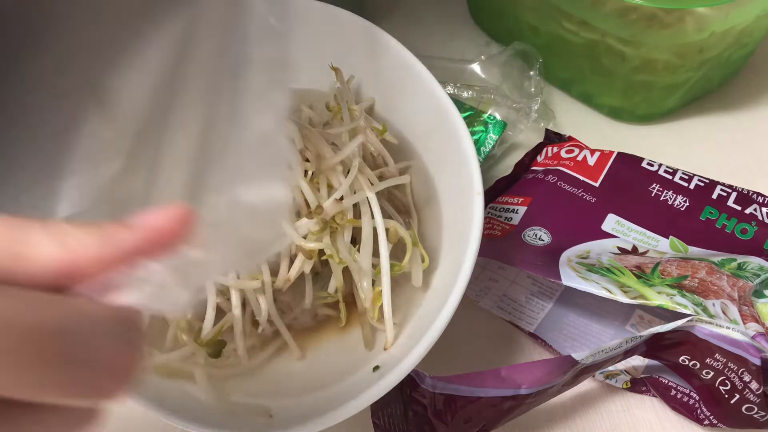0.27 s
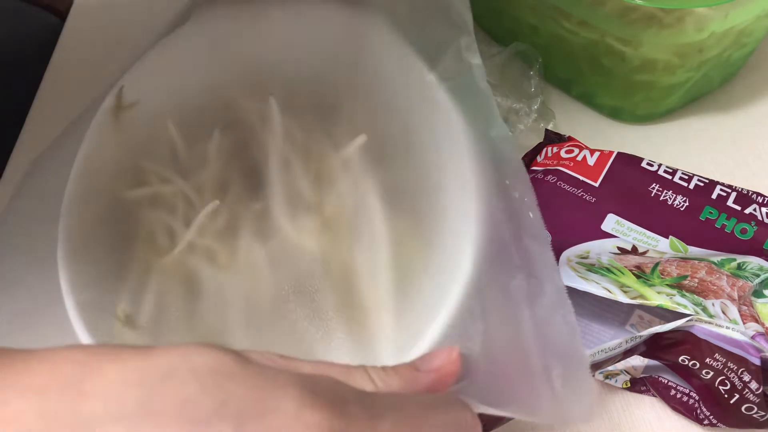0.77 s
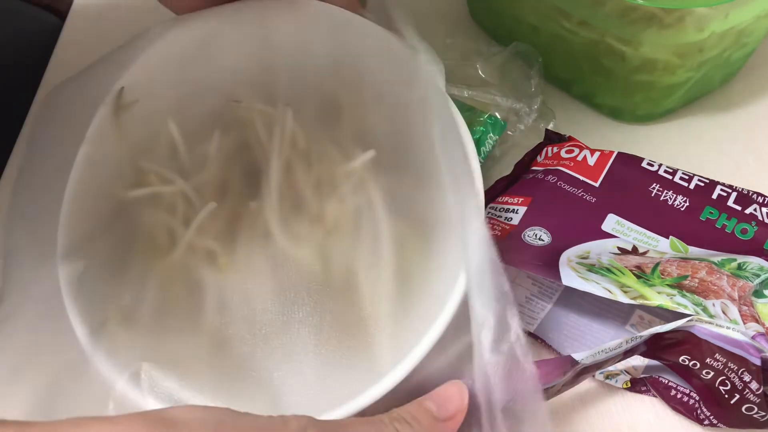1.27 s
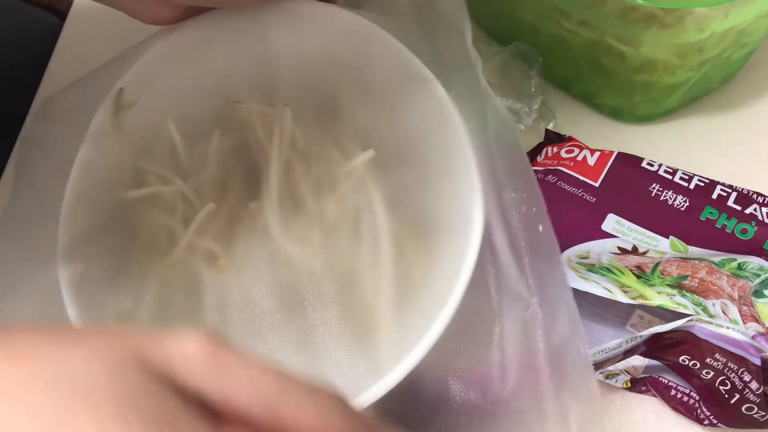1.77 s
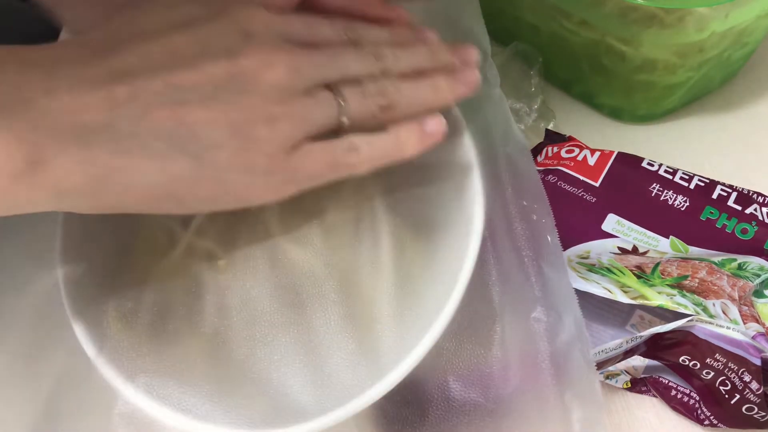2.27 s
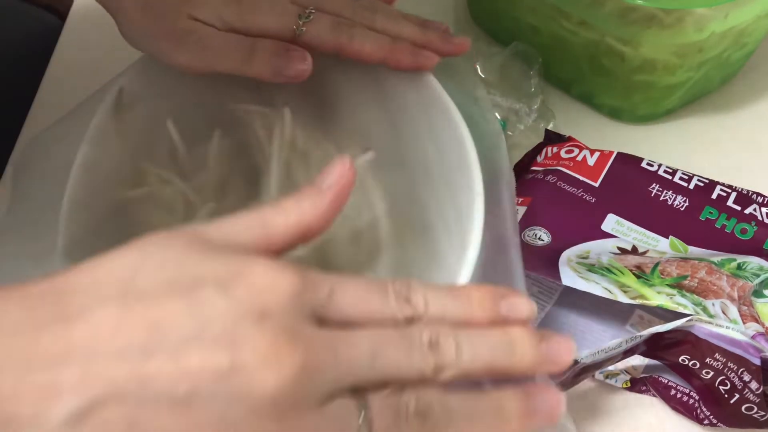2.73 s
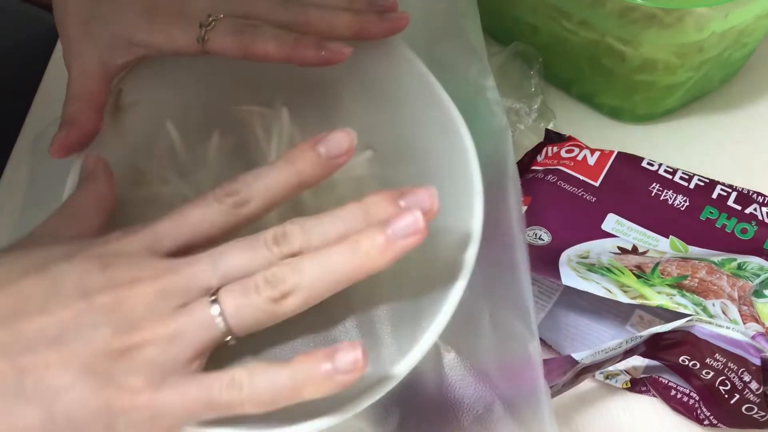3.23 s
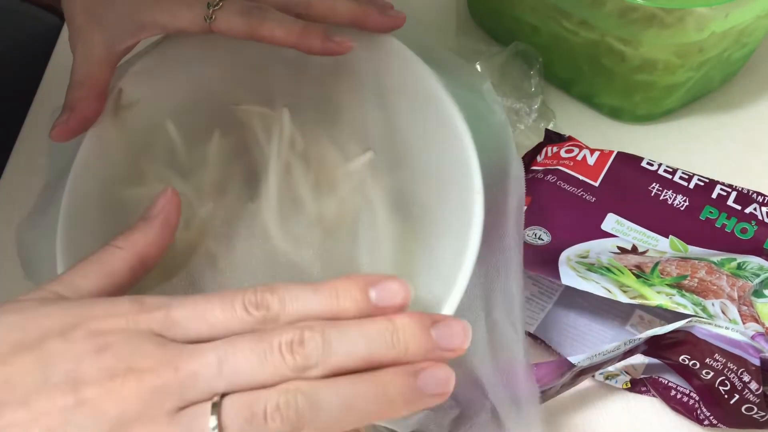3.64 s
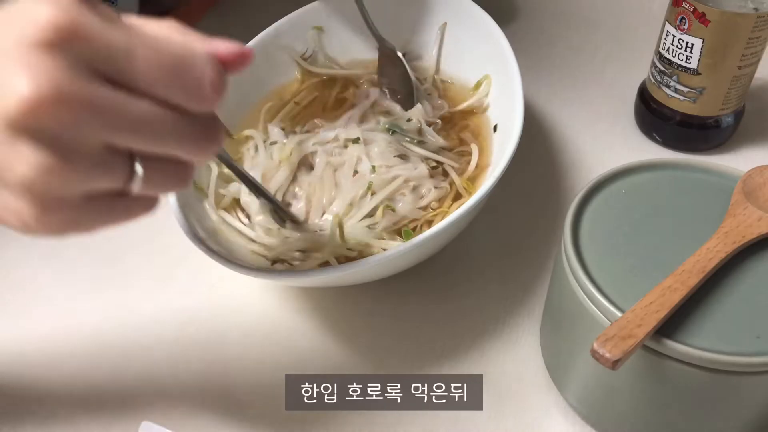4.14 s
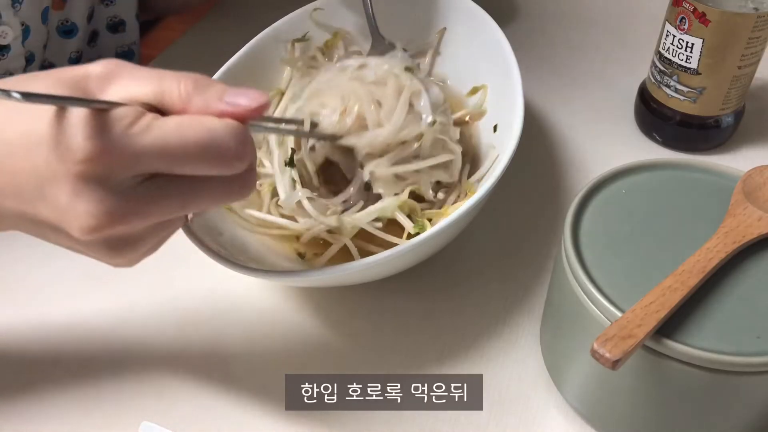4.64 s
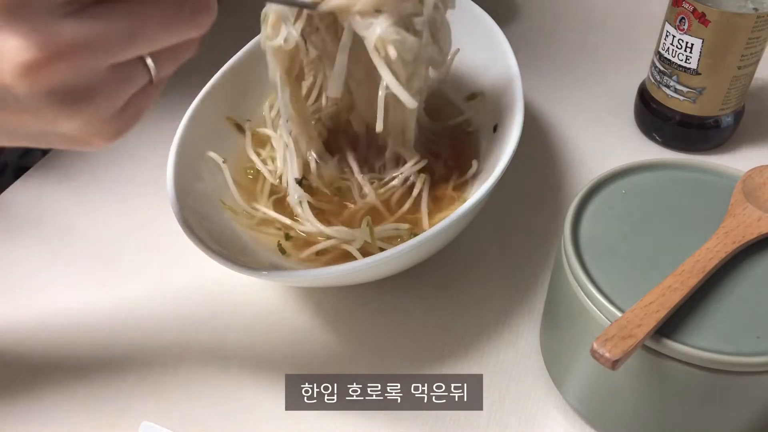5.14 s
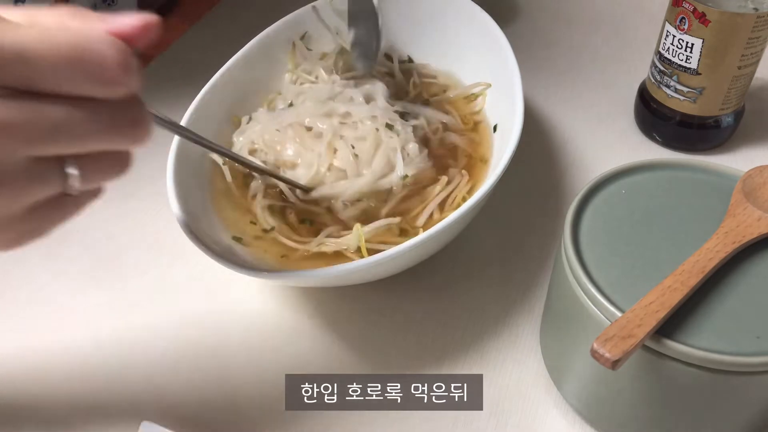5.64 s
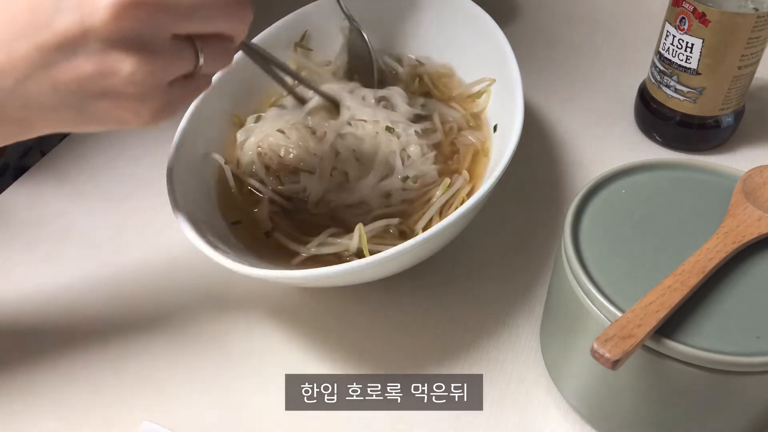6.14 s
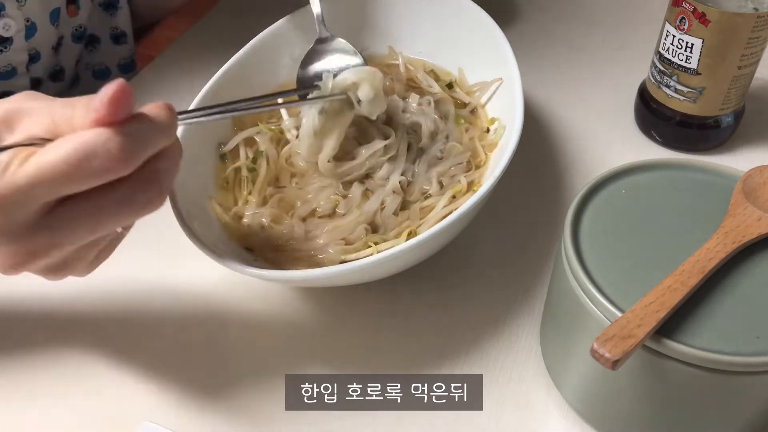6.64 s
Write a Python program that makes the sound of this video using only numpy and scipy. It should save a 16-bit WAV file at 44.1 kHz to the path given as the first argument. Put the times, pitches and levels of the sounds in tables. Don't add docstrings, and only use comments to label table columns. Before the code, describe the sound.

Cling film crackles and snaps as hands smooth it over a ceramic bowl, then wet noodles tick softly and cutlery knocks the bowl.

```python
import sys
import numpy as np
from scipy import signal
from scipy.fft import rfft, irfft, next_fast_len
from scipy.io import wavfile

SR = 44100
rng = np.random.default_rng(int(sys.argv[2]) if len(sys.argv) > 2 else 0)


def master_out(mix):
    frames = np.transpose(np.atleast_2d(mix))
    ceiling = np.clip(frames, -1, 1)
    pcm = np.round(ceiling * 32767).astype(np.int16)
    wavfile.write(sys.argv[1], SR, pcm)


def invert_db(level):
    return 10 ** (np.asarray(level, dtype=float) / 20)


N = 303828
MOVES_S = [3.979, 6.657]


def rms_one(x):
    return x / np.sqrt(np.mean(x ** 2) + 1e-20)


def noise():
    return rng.standard_normal(N)


def in_time(rows):
    s, *columns = np.transpose(rows)
    return [np.interp(np.arange(N) / SR, s, c, left=-200, right=-200) for c in columns]


def drift(rate_hz):
    r = np.exp(-2 * np.pi * rate_hz / SR)
    once = signal.lfilter([1], [1, -r], rng.standard_normal(N + SR))
    return rms_one(signal.lfilter([1], [1, -r], once)[SR:])


def resonate(x, hz, width_hz):
    r = np.exp(-np.pi * width_hz / SR)
    zeros = (1 - r * r) / 2 * np.array([1, 0, -1])
    return signal.lfilter(zeros, [1, -2 * r * np.cos(2 * np.pi * hz / SR), r * r], x)


def body(x, peaks):
    return sum((-1) ** k * invert_db(db) * resonate(x, hz, width_hz)
               for k, (hz, width_hz, db) in enumerate(peaks))


def butter(x, order, hz, kind):
    return signal.sosfilt(signal.butter(order, hz, kind, fs=SR, output="sos"), x)


def colour(x, points):
    hz, db = np.transpose(points)
    f = np.fft.rfftfreq(N, 1 / SR) + 1
    gain_db = np.interp(np.log(f), np.log(hz), db, left=-90, right=-90)
    return rms_one(irfft(rfft(x) * invert_db(gain_db), N))


def bursts(per_s, spread_db, length_s):
    sizes = invert_db(spread_db * np.minimum(rng.exponential(1, N), 3))
    slips = sizes * (rng.random(N) < per_s / SR)
    gate = signal.lfilter([1], [1, -np.exp(-1 / (length_s * SR))], slips + 1e-18)
    return gate * noise()


def puff(decay_s):
    return rng.standard_normal(1300) * np.exp(-np.arange(1300) / (decay_s * SR))


def add(out, s, sound, peak_db):
    at = round(s * SR)
    out[at:at + len(sound)] += (invert_db(peak_db) * sound / np.abs(sound).max())[:N - at]


def swell(start, end, db, rise_db_per_s, fall_db_per_s):
    t = np.arange(0, N, 8) / SR
    before, after = np.maximum(start - t, 0), np.maximum(t - end, 0)
    return np.repeat(invert_db(db - rise_db_per_s * before - fall_db_per_s * after), 8)[:N]


# (start [s], end [s], rustle [dB], drumming re rustle [dB], graininess [0-1])
SPELLS = [(0, 0.19, -50.5, -9, 0.75), (0.182, 0.681, -51, -5, 0.85), (.69, .87, -59, 3, 0.66),
          (.87, 1.66, -49.5, 1, 0.93), (1.68, 1.853, -54.5, 3, 0.84), (1.87, 2.087, -65.5, 3, 1),
          (2.375, 2.38, -50.5, -3, 0.3), (2.394, 2.762, -51, -0.5, 0.76), (2.775, 2.988, -52, -2, 0.6),
          (2.96, 3.14, -78.5, 13.5, 1), (3.205, 3.23, -67, -4, 0.7), (3.232, 3.5, -55.5, -4, 0.3),
          (3.5, 3.986, -50, -4.5, 0.79)]
GRIP_DB_PER_S, LET_GO_DB_PER_S = 2200, 505
# (start [s], length [s], level [dB], extra drumming [dB])
TUGS = [(.003, 0.036, -49, 5.5), (0.213, 0.098, -45, -4), (0.445, 0.026, -47, -2),
        (0.52, 0.086, -46.5, 0.5), (0.75, 0.05, -53, -1.5), (0.907, 0.059, -45, 1.5),
        (1.013, 0.14, -45.5, 1), (1.172, 0.015, -43.5, -1), (1.3, 0.021, -45.5, -2),
        (1.413, 0.042, -45.5, 1.5), (1.48, 0.093, -45, -13), (1.536, 0.09, -40.5, -5),
        (1.739, 0.0096, -49.5, -10), (1.794, 0.0089, -47.5, -3.5), (1.979, 0.016, -51.5, -5.5),
        (2.426, 0.025, -49, 10), (2.541, 0.017, -41.5, -0.5), (2.585, 0.045, -41.5, -1.5),
        (2.702, 0.037, -46, -1.5), (2.75, 0.074, -46, -0.5), (2.878, 0.041, -47, 0.5),
        (3.243, 0.033, -47, 5.5), (3.533, 0.041, -48, 3.5), (3.601, 0.039, -41.5, 0.5),
        (3.676, 0.1, -47, 1.5), (3.83, 0.068, -48.5, 0.5)]
TUG_RISE_DB_PER_S, TUG_FALL_DB_PER_S = 626, 412


def hands():
    spells = [swell(start, end, db, GRIP_DB_PER_S, LET_GO_DB_PER_S) for start, end, db, *_ in SPELLS]
    tugs = [swell(s, s + length, db, TUG_RISE_DB_PER_S, TUG_FALL_DB_PER_S)
            for s, length, db, _ in TUGS]
    bed = np.max(spells, axis=0)
    tug_drums = [tug * invert_db(row[3]) for tug, row in zip(tugs, TUGS)]
    drumming = np.max([bed] + tug_drums, axis=0)
    now = np.array(SPELLS)[np.argmax(spells, axis=0)]
    return np.max([bed] + tugs, axis=0), drumming * invert_db(now[:, 3]), np.clip(now[:, 4], 0, 1)


def scattered(spread_db):
    return invert_db(spread_db * np.minimum(rng.exponential(1, N), 2.5)) * rng.choice([-1, 1], N)


CREASES_PER_S, CREASES_DB = 300, -9.5


def creases():
    sizes = scattered(8)
    born, dealt = rng.random(N) < CREASES_PER_S / SR, rng.integers(0, 10, N)
    return rms_one(sum(resonate(sizes * born * (dealt == k) + 1e-18, hz, 0.13 * hz) / np.sqrt(hz)
                       for k, hz in enumerate(np.geomspace(2000, 13000, 10))))


# (frequency [Hz], density [dB per Hz])
CRACKLE = [(880, -14), (1500, 12), (2220, 3), (2770, 8.5), (3180, 7), (5870, 8), (12000, 5.5), (15700, 0),
           (16100, -10), (16500, -45)]
# (frequency [Hz], width [Hz], level [dB])
DRUM = [(732, 420, 5.5), (1350, 247, 10.5), (1880, 780, -5)]
# (low [Hz], high [Hz])
PATCHES_HZ = [(700, 3000), (3000, 5500), (5500, 9500), (9500, 18000)]
# (time [s], peak [dB], pitch [Hz])
PULL_SNAPS = [(0.192, -21, 6390), (0.236, -37, 4700), (0.2523, -23, 7540), (0.3195, -24, 9000),
              (0.4514, -32, 4400), (0.4692, -14, 7860), (0.5332, -36, 1630), (0.559, -19, 6500),
              (0.646, -9, 8800), (0.7658, -19.5, 8100), (0.828, -21, 7610), (0.8591, -20, 8950),
              (1.0151, -30, 1980), (1.0958, -12.5, 2780), (1.1717, -18, 5800), (1.2527, -15, 4060),
              (1.3395, -13.5, 6100), (1.512, -17, 3820), (1.5274, -7.5, 8400), (1.5553, -28, 5450),
              (1.589, -19, 6100), (1.706, -20, 2600), (1.7496, -32, 1620), (1.789, -28, 1600),
              (1.8467, -29, 1620), (1.9435, -28.5, 1640), (1.969, -32, 1970), (1.9969, -16.5, 4030),
              (2.0862, -22.5, 12000)]
# (time [s], peak [dB], pitch [Hz])
SMOOTH_SNAPS = [(2.379, -40, 1940), (2.3987, -24, 1780), (2.4123, -13.5, 1950), (2.442, -36, 1880),
                (2.4943, -31, 1910), (2.533, -22, 3640), (2.683, -23, 6320), (2.7026, -14, 8600),
                (2.7232, -16.5, 1880), (2.7707, -20.5, 3800), (2.648, -25, 1290), (2.881, -19, 1400),
                (2.917, -25, 1490), (2.9674, -22.5, 1540), (3.044, -44, 1510), (3.133, -26.5, 3650),
                (3.2023, -53, 2010), (3.237, -21, 1530), (3.508, -43, 1560), (3.528, -16.5, 7200),
                (3.5647, -16, 3920), (3.6297, -9, 6560), (3.684, -8, 10900), (3.717, -15.5, 11200),
                (3.789, -20.5, 3940), (3.906, -19, 4160), (3.9539, -21, 11100), (3.9716, -15, 10500)]
# (time [s], peak [dB], pitch [Hz])
THUDS = [(0.432, -37, 1650), (1.1085, -17, 1300), (1.43, -22, 1300), (1.4518, -23, 1500),
         (1.798, -19, 1900), (2.045, -36.5, 934), (3.43, -24.5, 1200), (3.4705, -28, 1350),
         (3.54, -27, 1410), (3.58, -25, 1320), (3.8521, -23, 1180)]
# (time [s], peak [dB], pitch [Hz])
PULL_PRICKS = [(0.012, -22.5, 5400), (0.0252, -27, 2870), (0.0374, -29, 4390), (0.0842, -40, 5100),
               (0.1643, -26, 2500), (0.2129, -39, 3040), (0.2817, -22, 4640), (0.3274, -29, 9000),
               (0.3546, -33, 8000), (0.3716, -33, 5720), (0.4804, -41, 5250), (0.535, -25.5, 8400),
               (0.6065, -32, 5370), (0.637, -24.5, 8090), (0.6634, -34, 11700), (0.676, -33, 7000),
               (0.6874, -34, 9310), (0.755, -29.5, 3970), (0.787, -25, 7410), (0.8574, -28.5, 8230),
               (0.8884, -46, 6680), (0.9046, -29, 2650), (0.9645, -27.5, 7500), (1.0021, -43, 6000),
               (1.0395, -24, 7140), (1.0435, -24, 6000), (1.063, -30, 7000), (1.077, -26, 5500),
               (1.1116, -24, 7100), (1.1204, -23, 8000), (1.196, -24, 8010), (1.2343, -24, 5510),
               (1.2885, -28, 4930), (1.299, -32, 2730), (1.3099, -26, 7910), (1.4077, -38, 2790),
               (1.4505, -33, 7570), (1.484, -33, 5270), (1.496, -28, 3630), (1.683, -40, 2520),
               (1.7174, -25, 3460), (1.748, -29, 7400), (1.7883, -38, 2680), (1.8463, -31, 8240),
               (1.9774, -34, 4210)]
# (time [s], peak [dB], pitch [Hz])
SMOOTH_PRICKS = [(2.396, -19.5, 3470), (2.4493, -28, 3600), (2.4942, -23, 4180), (2.5474, -27, 3750),
                 (2.579, -34, 4150), (2.5935, -25, 6090), (2.6294, -18.5, 8200), (2.648, -23, 2650),
                 (2.6597, -27, 7450), (2.723, -17, 11500), (2.8397, -26, 6040), (3.532, -25, 9500),
                 (3.5612, -27, 13000), (3.582, -24, 9500), (3.5995, -28, 4000), (3.621, -18.5, 9000),
                 (2.9794, -34, 3270), (3.044, -36.5, 5270), (3.1217, -50, 4070), (3.2246, -44, 2780),
                 (3.5694, -24, 8950), (3.5814, -29, 3070), (3.6077, -31, 3660), (3.6338, -15, 7100),
                 (3.671, -28, 11900), (3.6994, -29, 12500), (3.7474, -23, 8910), (3.75, -24, 3830),
                 (3.8363, -22.5, 7110), (3.86, -29, 3930)]
SNAP_DRUM_DB, SNAP_DRUM_DB_PER_OCTAVE = -23.5, -4.5
TREBLE_HZ, TREBLE_SWING_DB = 7100, 3


def film():
    crackle, drum, grain = hands()
    clumps = invert_db(2.2 * drift(60))
    slips = 0.43 * rms_one(bursts(500 * clumps, spread_db=4.5, length_s=0.00049))
    for band_hz in PATCHES_HZ:
        patch = rms_one(bursts(350 * clumps, spread_db=6.0, length_s=0.0011))
        slips += 0.94 * butter(patch, 1, band_hz, "band")
    slide = noise() * invert_db(2.9 * drift(64))
    rub = grain * rms_one(slips) + np.sqrt(1 - grain ** 2 + invert_db(-62.0)) * slide
    sheet = colour(rub, CRACKLE) + invert_db(CREASES_DB) * grain * creases()
    treble = butter(sheet, 1, TREBLE_HZ, "high")
    treble_db = TREBLE_SWING_DB * grain * drift(11.3) - 2.6 * grain
    out = crackle * (sheet + (invert_db(treble_db) - 1) * treble)
    slow = rms_one(bursts(200 * invert_db(3.2 * drift(30)), spread_db=0.5, length_s=0.0068))
    out += drum * rms_one(body(1.82 * rub + grain * slow, DRUM))
    for s, db, hz in PULL_SNAPS + SMOOTH_SNAPS + THUDS:
        burst = puff(0.0005)
        edge = 0.37 * np.clip(hz / 3000, .3, 1) ** 2 * np.diff(burst)
        add(out, s, edge + 1.5 * resonate(burst, hz, 0.36 * hz)[1:], db - 7.5)
        drum_db = SNAP_DRUM_DB + SNAP_DRUM_DB_PER_OCTAVE * np.log2(hz / 2000)
        add(out, s, body(puff(0.0087), DRUM), db + drum_db)
    for s, db, hz in PULL_PRICKS + SMOOTH_PRICKS:
        burst = puff(0.0006)
        add(out, s, 0.34 * np.diff(burst) + 1.35 * resonate(burst, hz, 1.1 * hz)[1:], db - 1.0)
    return out * (np.arange(N) / SR < MOVES_S[0])


# (frequency [Hz], density [dB per Hz])
AIR_FILM = [(22, -30), (42, -14), (58, -2.5), (103, -10.5), (153, -2.5), (193, -6), (315, -2.5),
            (398, -9.5), (800, -16.5), (1100, -18.5), (1950, -29.5), (3580, -31.5), (16000, -43)]
# (frequency [Hz], density [dB per Hz])
AIR_TABLE = [(22, -31), (42, -27), (60, -4), (103, -2.5), (315, 4), (515, -9.5), (621, -7.5), (767, -15.5),
             (924, -14), (2350, -27), (11800, -34.5), (16000, -36)]
# (frequency [Hz], density [dB per Hz])
AIR_CLOSE = [(35, -50), (60, -9), (250, -11.5), (427, -4), (1660, -27.5), (2250, -28), (4030, -40),
             (6000, -36), (12700, -45), (16000, -39)]
AIR_DB = [-56, -56, -55]
# (frequency [Hz], width [Hz], level [dB])
HUM = [(53.87, 2, -70), (622, 6.7, -73)]


def background():
    spot = np.searchsorted(MOVES_S, np.arange(N) / SR)
    airs = zip([AIR_FILM, AIR_TABLE, AIR_CLOSE], AIR_DB)
    out = sum((spot == k) * invert_db(db) * colour(noise(), points) for k, (points, db) in enumerate(airs))
    for hz, width_hz, db in HUM:
        hum = rms_one(resonate(resonate(noise(), hz, width_hz), hz, width_hz))
        out += (spot < 2) * invert_db(db) * hum
    return out


# (time [s], peak [dB], lingering [dB], crack [dB], crack pitch [Hz])
KNOCKS = [
    [(6.002, -57, -13, 7, 4000), (6.0907, -18, -20.5, 5.5, 2610)],
    [(4.127, -35, -22, 3.5, 9200)],
]
# (frequency [Hz], struck on wall [dB], struck on rim [dB], t60 [s])
BOWL = [(381, -22, -34, 0.19), (877, -3.5, -15, 0.085), (1400, -2, -2, 0.023), (1694, -9, -9, 0.059),
        (2246, 0, -5, 0.015), (2700, 3, -12, 0.056), (3390, -7.5, -14, 0.034), (3850, -3.5, -16.5, 0.066),
        (4280, -14.5, -16, 0.043), (5096, -10, -2, 0.06), (5150, -8, -20, 0.043), (6560, 0, -27, 0.055),
        (7230, -15, -2, 0.042), (8200, -14, -3, 0.079), (9900, -13, 2, 0.037), (11800, -22.5, -22, 0.053),
        (12400, -18.5, -11, 0.045), (13810, -22, -4, .04), (2084, -19.5, -19, 0.066),
        (15400, -26.5, -7, .02)]
RING_SHARE = [1.166, 0.69]
# (t60 [s], its power of ring time [1], width [Hz], more width [Hz per Hz])
LINGER = (0.31, 0.13, 32, 0.006)
# (time [s], level [dB], frequency [Hz], t60 [s])
TOUCHES = [
    (1.497, -56, 1880, 0.15),
    (3.27, -42, 692, 0.21),
    (3.56, -34, 3880, 0.023),
    (3.562, -39, 5270, 0.031),
    (4.066, -55.5, 1707, 0.14),
    (4.066, -65, 2690, 0.11),
    (4.068, -66, 3840, .08),
    (4.136, -64, 2700, 0.22),
    (6.199, -43.5, 269, 0.37),
]
RATTLE_DB, RATTLE_T60_S, RATTLE_HZ = [-16.5, -25], [0.12, 0.3], [3500, 8000]


def bowl():
    out, t = np.zeros(N), np.arange(SR // 2) / SR
    linger_t60, power, width_hz, wider = LINGER
    for place, knocks in enumerate(KNOCKS):
        share = RING_SHARE[place]
        for s, db, linger_db, crack_db, crack_hz in knocks:
            at = round(s * SR)
            for hz, *balance_db, free_t60 in BOWL:
                decay = invert_db(-60 * t / (share * free_t60))
                main = decay * np.sin(2 * np.pi * hz * t) * np.minimum(t / 0.0005, 1)
                wavering = rms_one(resonate(rng.standard_normal(len(t)), hz, width_hz + wider * hz))
                long_t60 = share * linger_t60 * (free_t60 / 0.068) ** power
                lingering = invert_db(linger_db - 60 * t / long_t60) * wavering
                lingering *= np.minimum(free_t60 / .04, 1) ** 2 * (1 - np.exp(-t / .012))
                out[at:at + len(t)] += invert_db(db + balance_db[place]) * (main + lingering)
            crack = resonate(puff(0.0035), 0.6 * crack_hz, 0.9 * crack_hz)
            add(out, s, resonate(crack, crack_hz, 1.4 * crack_hz), db + crack_db)
            contact = resonate(puff(0.0002), crack_hz, crack_hz)
            add(out, s, contact, db + crack_db + 7.0)
            rattle_hz = RATTLE_HZ[place]
            wash = rms_one(resonate(rng.standard_normal(len(t)), rattle_hz, 1.9 * rattle_hz))
            out[at:at + len(t)] += invert_db(db + RATTLE_DB[place] - 60 * t / RATTLE_T60_S[place]) * wash
    for s, db, hz, t60 in TOUCHES:
        add(out, s, invert_db(-60 * t / t60) * np.sin(2 * np.pi * hz * t) * np.minimum(t / 0.0025, 1), db)
    return butter(out, 2, 220, "high")


# (time of top [s], level [dB], t60 [s])
PATS = [
    (2.458, -43, 0.45),
    (3.277, -40.5, 0.27),
    (6.105, -43, 0.14),
    (6.215, -54, 1),
]
# (frequency [Hz], width [Hz], level [dB])
PAT = [(131, 22, 3.5), (324, 133, 3)]
PAT_RISE_DB_PER_S = 900.5


def palms():
    pump = sum(swell(s, s, db, PAT_RISE_DB_PER_S, 60 / t60) for s, db, t60 in PATS)
    return pump * rms_one(body(noise(), PAT))


# (time [s], level [dB])
DRIBBLE = [(4.0, -62), (4.16, -79), (4.27, -72), (4.6, -71.5), (5.12, -71), (5.4, -59), (5.5, -62.5),
           (5.62, -59), (5.85, -70), (6.3, -68.5), (6.89, -79)]
# (time [s], peak [dB], pitch [Hz])
TICKS = [(4.1624, -30.5, 6430), (4.2262, -29.5, 10500), (4.505, -36.5, 5160), (4.606, -34.5, 6230),
         (4.7728, -25.5, 5100), (4.834, -35, 7200), (4.88, -37, 13000), (4.9675, -52, 1550),
         (5.045, -37, 2190), (5.208, -30.5, 3860), (5.247, -30.5, 3950), (5.2748, -25, 4260),
         (5.297, -28.5, 3050), (5.3182, -45, 3270), (5.3426, -24.5, 4000), (5.378, -29, 3630),
         (5.437, -22, 6000), (5.466, -26, 5040), (5.5043, -33, 3950), (5.528, -32, 2900),
         (5.681, -28.5, 2470), (5.71, -28, 8200), (5.728, -29, 4860), (5.756, -27.5, 2300),
         (5.8754, -33, 6900), (5.9126, -29, 6540)]
# (time [s], peak [dB], pitch [Hz])
SETTLING = [
    (6.3416, -34, 2120),
    (6.363, -33, 4030),
    (6.433, -39.5, 3980),
    (6.4633, -42, 3830),
    (6.5065, -34.5, 6600),
    (6.621, -39.5, 3200),
    (6.63, -38, 8000),
    (6.643, -31.5, 8200),
    (6.6724, -39, 2330),
]
# (time [s], peak [dB], pitch [Hz])
FIZZ = [(4.2911, -40, 10200), (4.3794, -42, 12100), (4.4104, -41, 11200), (4.579, -35, 11400),
        (4.7187, -41, 9190), (4.9671, -39, 11900), (5.4256, -47, 8850), (5.5444, -50, 8750),
        (5.7778, -35, 13300), (5.9484, -42, 13100), (6.0596, -34, 12700), (6.2387, -41.5, 10400),
        (6.618, -38.5, 13000), (6.2667, -41, 12700), (6.2861, -41, 8200), (6.3819, -43.5, 8390),
        (6.068, -31, 6500), (6.16, -37, 11300)]
# (time [s], peak [dB], pitch [Hz])
STRANDS = [(4.228, -39, 5860), (4.2424, -39, 5160), (4.2751, -50, 4540), (4.414, -49, 3080),
           (4.6608, -50, 3710), (4.801, -41, 7590), (4.8086, -37, 5250), (5.0105, -44, 3000),
           (5.0573, -38, 2220), (5.062, -41.5, 6300), (5.1322, -48, 1940), (5.1517, -42, 2450),
           (5.1584, -40.5, 5600), (5.171, -41, 2070), (5.2364, -52, 4110), (5.2863, -47, 3220),
           (5.3005, -34, 1850), (5.3364, -34, 5230), (5.347, -32.5, 2660), (5.353, -30, 4050),
           (5.369, -35, 3820), (5.38, -34, 3660), (5.4004, -53, 2750), (5.411, -53, 5800),
           (5.5144, -38, 1920), (5.5385, -50, 2680), (5.5497, -40.5, 2010), (5.5624, -45, 2000),
           (5.5802, -38, 6910), (5.5894, -40, 6910), (5.6027, -43, 3390), (5.6176, -51, 2630),
           (5.617, -42, 3680), (5.6511, -43, 2910), (5.692, -35, 8500), (5.7274, -36, 5000),
           (5.7506, -46, 2190), (5.7786, -39, 4860), (5.793, -40, 4590), (5.7994, -39, 4850),
           (5.828, -43, 3920), (5.8334, -51, 1960), (5.8574, -56, 6920), (5.9014, -48, 6590),
           (6.0392, -49, 5180), (6.2114, -47, 6400), (5.3215, -49, 6500), (5.289, -45, 10200),
           (5.4302, -46, 12500), (5.522, -51, 10000), (6.279, -39, 6820), (6.399, -60, 3840),
           (6.441, -49, 2790), (6.4754, -55, 2040)]
# (time [s], peak [dB], pitch [Hz])
SPECKS = [(4.003, -44, 8930), (4.011, -38, 8430), (4.0264, -51, 6000), (4.0677, -47, 8100),
          (4.0806, -48, 12400), (4.0944, -50, 13000), (4.2574, -56, 8140), (4.2867, -54, 7860),
          (4.2974, -52, 12500), (4.326, -47, 5880), (4.3625, -53, 6950), (4.4392, -48, 7240),
          (4.4712, -50, 8480), (4.5655, -50, 11400), (4.6803, -47, 8600), (4.7264, -55, 9060),
          (4.8569, -48, 8000), (4.9337, -48, 7200), (5.0005, -55, 7910), (5.0325, -53, 5800),
          (5.2464, -57, 5870), (5.2954, -34, 8460), (5.3074, -56, 5810), (5.347, -33, 6760),
          (5.3894, -34, 6940), (5.4304, -53, 5780), (5.5373, -43, 11200), (5.5524, -45, 5960),
          (5.6824, -40, 8490), (5.8331, -49, 11800), (5.9723, -54, 8060), (6.4323, -42.5, 9100),
          (6.6179, -53, 7880)]
BUSY_TILT = .3


def noodles():
    sizes = scattered(3.7)
    busy_db, = in_time(DRIBBLE)
    clicks_per_s = 450 * invert_db(.9 * (busy_db + 60) + 2.5 * drift(15))
    born, dealt = rng.random(N) < clicks_per_s / SR, rng.integers(0, 14, N)
    tilt_db = -4 - BUSY_TILT * np.clip(busy_db + 64, -10, 10)
    seep = rms_one(resonate(resonate(noise(), 3300, 4000), 3500, 6000))
    fine = np.zeros(N)
    for k, hz in enumerate(np.geomspace(1700, 9500, 14)):
        ring = resonate(sizes * born * (dealt == k) + 1e-18, hz, 0.21 * hz)
        fine += invert_db(tilt_db * np.log2(hz / 4500)) * resonate(ring, hz, 1.3 * hz)
    out = invert_db(busy_db) * (0.42 * rms_one(fine) + 0.35 * seep)
    small = [(s, db + 4.5, hz) for s, db, hz in STRANDS + SPECKS]
    for s, db, hz in TICKS + SETTLING + FIZZ + small:
        burst = puff(0.0008)
        ring = resonate(resonate(burst, hz, 0.18 * hz), hz, 3.3 * hz)
        add(out, s, 0.053 * np.diff(burst) + ring[1:], db - 10.0)
    return out


# (time [s], level [dB])
SCRAPE = [(6.67, -69), (6.736, -52.5), (6.752, -42), (6.772, -66), (6.8, -68), (6.88, -88)]
# (frequency [Hz], width [Hz], level [dB])
SPOON = [(4830, 430, -6), (5800, 280, 8), (7260, 200, 0), (8400, 570, 3), (10500, 720, 2.5),
         (11500, 200, -2), (12600, 170, 12), (13000, 300, -4), (14300, 1400, -11)]


def spoon():
    rub = noise()
    modes = sum(invert_db(db + 4.9 * drift(24.0)) * resonate(rub, hz, width_hz) for hz, width_hz, db in SPOON)
    return invert_db(in_time(SCRAPE)[0]) * rms_one(modes + .04 * np.gradient(rub))


KITCHEN_T60_S, WALL_CUT_HZ, KITCHEN_DB = 0.3, 2500, -21


def kitchen(x):
    size = next_fast_len(N + SR)
    f = np.fft.rfftfreq(size, 1 / SR)
    t60 = KITCHEN_T60_S / (1 + f / WALL_CUT_HZ)
    lags_s = rng.uniform(.008, 0.038, 10)
    loops = [invert_db(-60 * lag / t60) * np.exp(-2j * np.pi * f * lag) for lag in lags_s]
    return irfft(rfft(x, size) * sum(g / (1 - g) for g in loops), size)[..., :N]


def scene():
    near = film() + palms() + noodles() + bowl() + spoon()
    before = np.arange(N) / SR < MOVES_S[0]
    echoes = kitchen(np.stack([near * before, near * ~before]))
    room = echoes[0] * before + echoes[1]
    return (near + invert_db(KITCHEN_DB) * room + background())[None]


def roll_off(x):
    return signal.sosfilt(signal.butter(12, 16970, fs=SR, output="sos"), x)


def record(dry):
    overload = .5
    mix = overload * np.tanh(dry / overload)
    for stop_db, stop_hz in [(32, 16050), (50, 17200)]:
        mix = signal.sosfilt(signal.cheby2(12, stop_db, stop_hz, fs=SR, output="sos"), mix)
    return roll_off(mix)


dry = scene()
out = record(dry)
master_out(out)
```